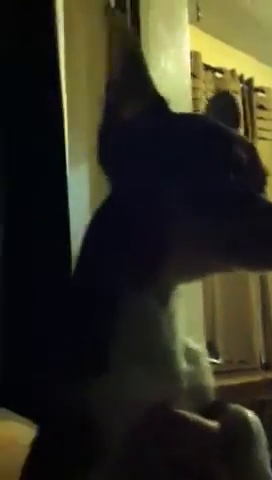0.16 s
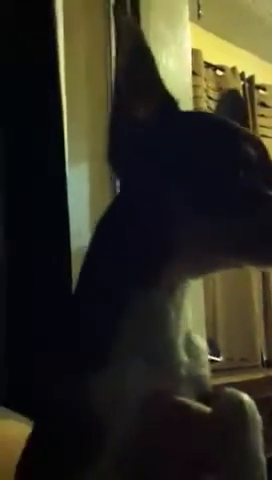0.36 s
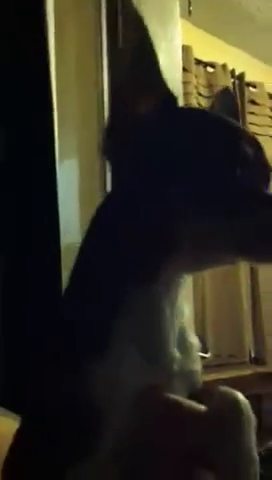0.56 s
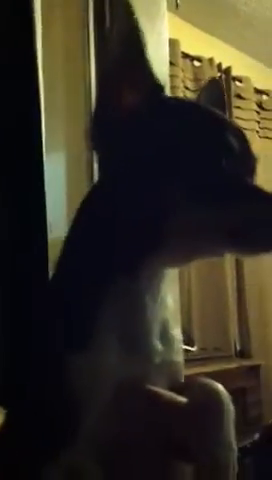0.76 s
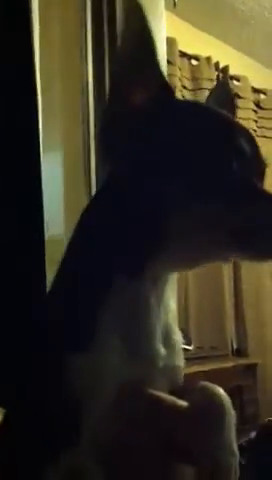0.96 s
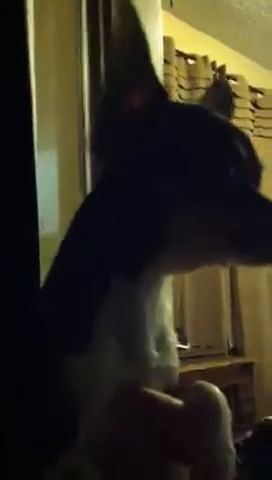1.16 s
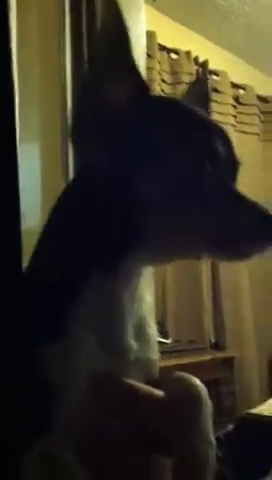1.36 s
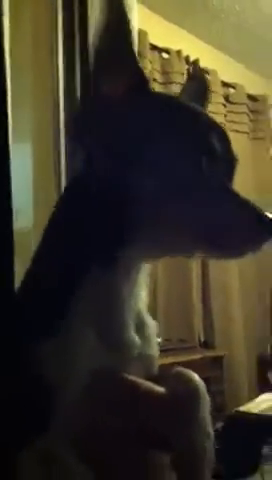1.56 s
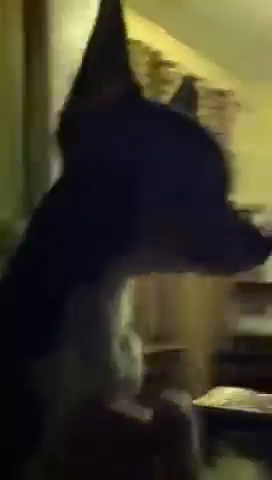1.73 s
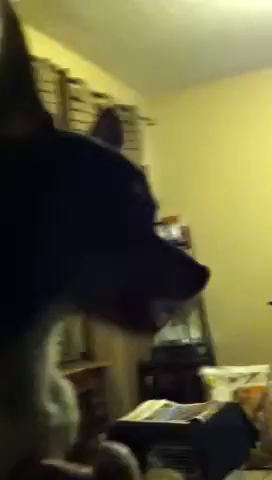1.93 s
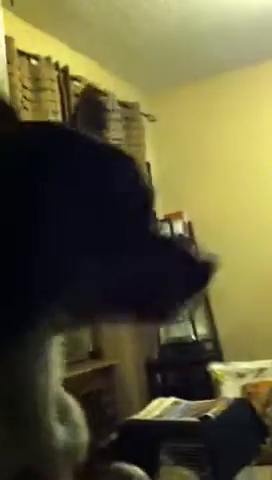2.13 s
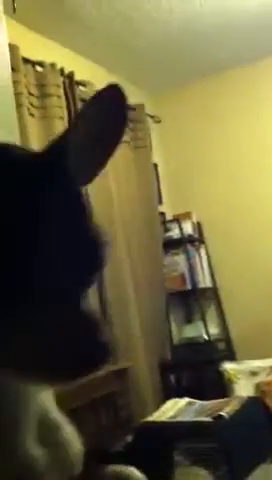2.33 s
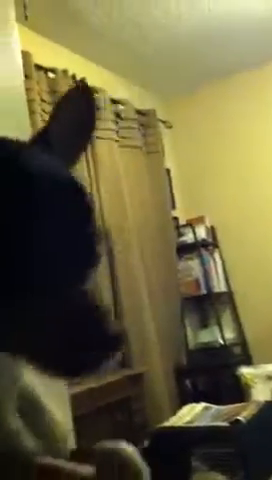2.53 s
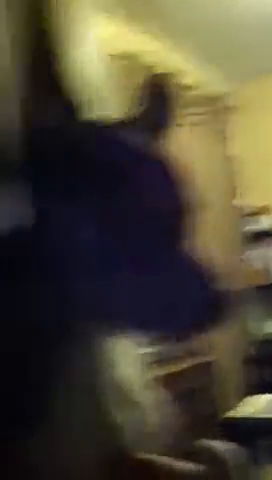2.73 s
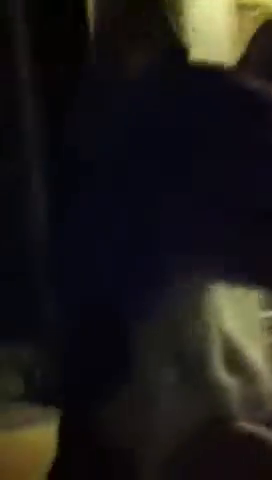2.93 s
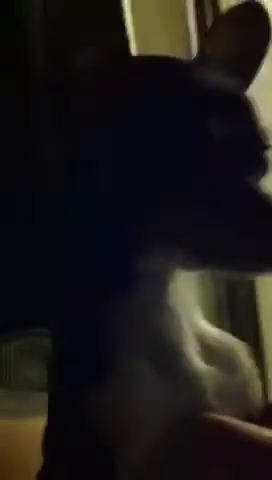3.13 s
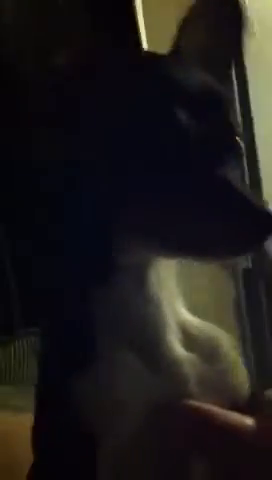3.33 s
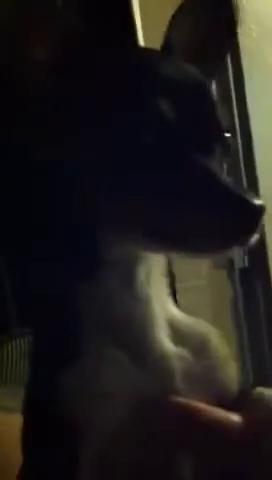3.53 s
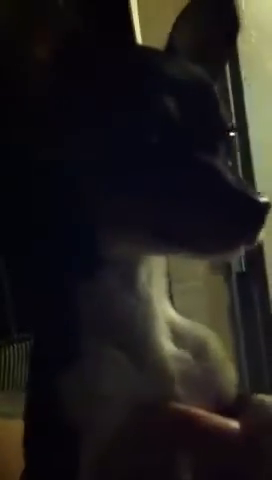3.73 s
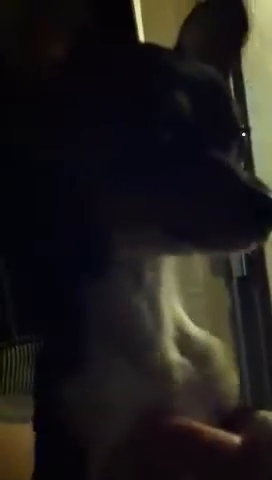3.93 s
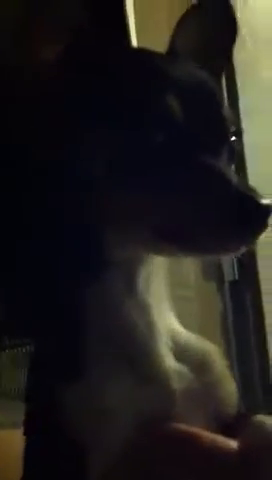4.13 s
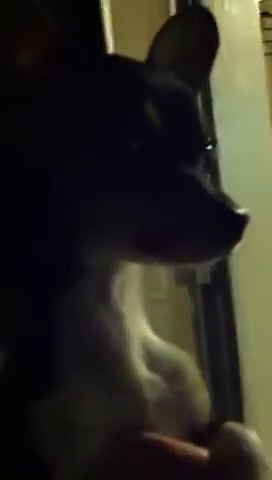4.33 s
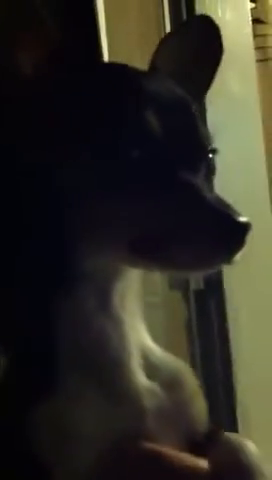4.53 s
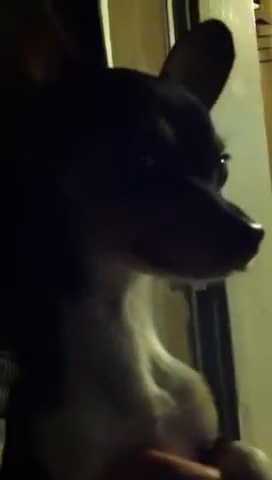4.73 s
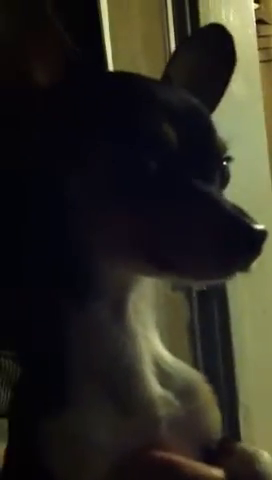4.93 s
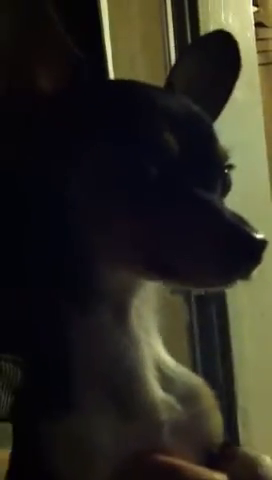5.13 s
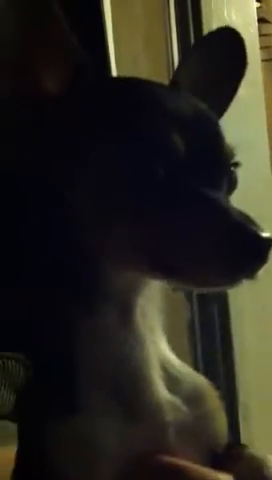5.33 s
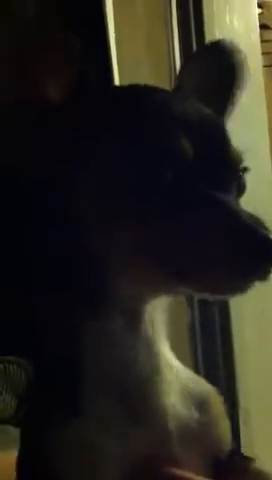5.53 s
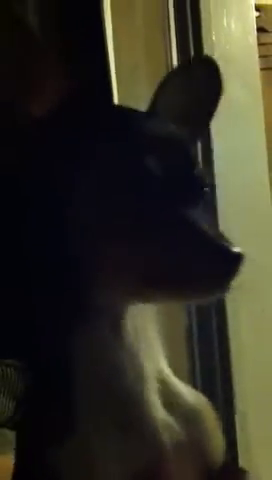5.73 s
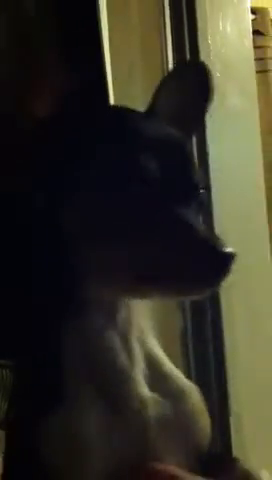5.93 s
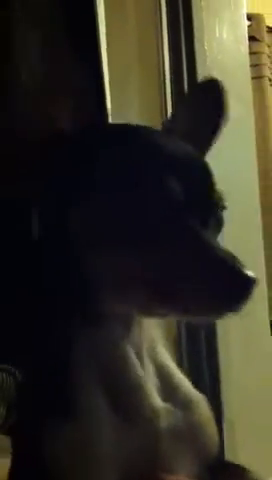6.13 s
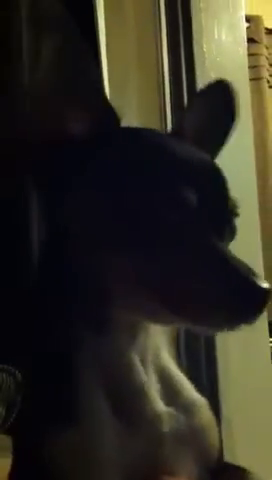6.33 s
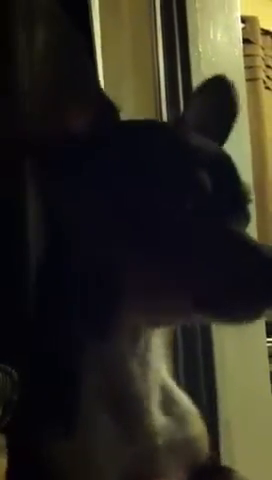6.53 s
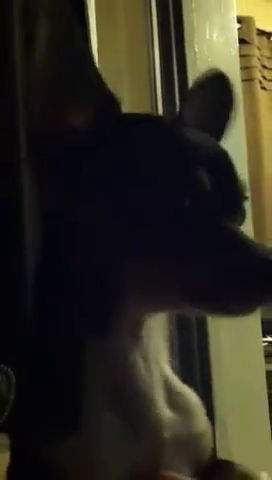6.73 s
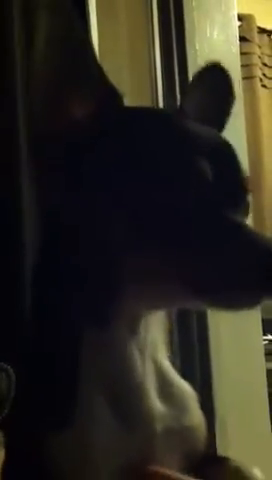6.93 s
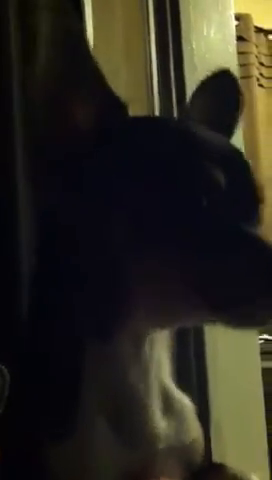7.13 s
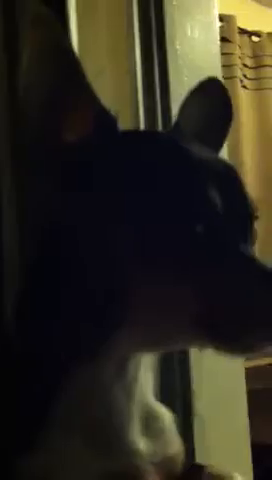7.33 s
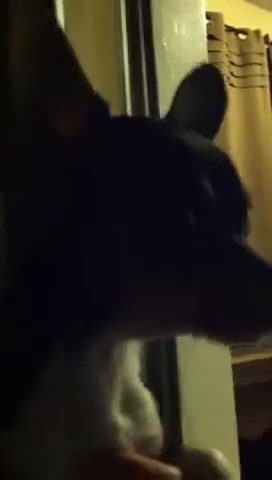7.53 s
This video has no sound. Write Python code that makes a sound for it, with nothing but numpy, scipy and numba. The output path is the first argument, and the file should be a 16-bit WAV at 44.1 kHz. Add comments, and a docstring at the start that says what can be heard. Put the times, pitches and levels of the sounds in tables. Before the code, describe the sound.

Quiet furnished living room with faint steady hiss and hum. A little dog right at the microphone starts with a nasal, closed-mouth growl chopped into quick flutters, dying away after a second. Four clipped, rough barks follow with long gaps between the first three, each trailing a short breath and small room echo. Tiny metal tag clicks come between. The last bark leads straight into another purring growl that lasts to the end.

```python
"""Small dog growling and barking indoors

A small dog close to the microphone growls, barks four times and growls again in a quiet furnished room.
The growl is a train of vocal pulses chopped into throbs by a flapping palate. Each bark drives jittered
pulses and noise through an opening mouth and ends in a puff of breath. The room echoes the dog, hums and
hisses faintly; a metal collar tag ticks.
"""
import sys
import numpy as np
from scipy import signal
from scipy.fft import rfft, irfft
from scipy.io import wavfile
from scipy.ndimage import uniform_filter1d
from numba import njit

SR = 44100
rng = np.random.default_rng(int(sys.argv[2]) if len(sys.argv) > 2 else 0)


def generate_wav(signal):
    """Clip the signal to [-1, 1] and save it as 16-bit WAV at the path in sys.argv[1]."""
    frames = np.transpose(np.atleast_2d(signal))
    scaled = np.clip(frames, -1, 1) * 32767
    pcm = np.round(scaled).astype(np.int16)
    wavfile.write(sys.argv[1], SR, pcm)


N = 334278

# Room hiss spectrum. Each row: frequency in Hz, relative density in dB.
AIR_SPECTRUM = [(25, -34), (80, -16), (115, -12), (200, -4.5), (400, -5), (750, -7.5), (1200, -8),
                (2000, -11), (3500, -17.5), (5000, -20.5), (6500, -28), (9000, -32), (13000, -39.5),
                (15500, -51)]
# Appliance tones. Each row: frequency in Hz, width of each of two resonances in Hz, rms level in dB.
APPLIANCE_TONES = [(195.2, 10, -72.5), (381, 4.3, -72.5), (483, 9, -76.5)]
# Palate flapping, one list per steady growl. Each row: time in seconds, throbs per second.
PALATE_FLAPS = [
    [(.0005, 30.6), (.1687, 25.9), (.3369, 23.41), (.5051, 23.02), (.6734, 27.39), (.8416, 24.44),
     (1.0098, 24.56), (1.178, 21.23), (1.3462, 19.18)],
    [(6.8782, 28.22), (7.0515, 27.32), (7.2248, 27.82), (7.3982, 27.67), (7.61, 26)],
]
# Short catches of the voice, before two barks and as the last growl gets going. Each row: start in seconds,
# length in seconds, relative throat level in dB, relative muzzle level of the last pulse in dB.
VOICE_CATCHES = [(3.743, 0.0085, -32, -3), (5.4893, 0.0093, -30.5, -1), (6.607, 0.0073, -32.5, 2),
                 (6.638, 0.014, -34, -0.5), (6.666, .022, -34.5, 1), (6.715, 0.017, -37.5, -2),
                 (6.746, 0.015, -32, -1), (6.778, .0225, -33, 4), (6.818, 0.019, -32, -1.5),
                 (6.856, 0.011, -29, -1.5)]
# Growl voice, one list per growl. Each row: time in seconds, pitch in Hz, throat and muzzle in relative dB,
# nose resonance in Hz, nose level in dB, nostril whistle in Hz, whistle level in dB, throat resonance in Hz,
# mouth resonance in Hz, cheek resonance in Hz, cheek level in dB against the mouth.
GROWL_VOICES = [
    [(0, 212.5, -30.5, -40, 2070, -74, 8340, -82.5, 430, 815, 1110, 3),
     (.12, 213.6, -28, -38.5, 2200, -83, 8330, -84, 450, 773, 1110, 3.5),
     (.24, 207, -31.5, -40, 2380, -74, 8450, -82, 437, 800, 1100, 3.5),
     (.35, 184, -32.5, -42.5, 2580, -73, 8730, -81, 393, 800, 1060, 1.5),
     (.45, 174.2, -34, -44.5, 2750, -70, 8970, -85.5, 372, 790, 990, 4.5),
     (.55, 181.6, -33, -42.5, 2860, -78, 8950, -83, 382, 790, 980, 2.5),
     (.64, 182.6, -33.5, -41.5, 2620, -70, 8900, -84, 384, 830, 1020, 1.5),
     (.72, 198, -32.5, -36.5, 2240, -66, 9060, -82.5, 380, 790, 1120, 2),
     (.83, 196.3, -31.5, -39, 2490, -68, 8800, -83, 380, 784, 1090, 2),
     (.95, 187.3, -32.5, -42, 2520, -71, 8400, -83.5, 385, 770, 1070, 2),
     (1.07, 184, -32.5, -41, 2650, -69, 8600, -83, 380, 830, 1090, 2.5),
     (1.17, 179.7, -33.5, -43.5, 2770, -69, 8750, -85.5, 387, 854, 980, 2.5),
     (1.332, 156.4, -37, -45, 2980, -87, 8640, -89, 330, 794, 1010, -1)],
    [(6.6, 167, -20.5, -30, 2500, -67, 9200, -77.5, 333, 800, 1050, -10),
     (6.85, 171, -32.5, -33.5, 2490, -78, 8000, -91, 358.4, 656, 1040, -7),
     (6.97, 196.3, -29.5, -30.5, 2290, -63, 7900, -87, 403, 707, 1035, -7.5),
     (7.12, 184.7, -31, -34, 2270, -74, 8150, -86.5, 397, 692, 1000, -5),
     (7.33, 186.5, -29, -32.5, 2290, -67, 8600, -85.5, 434, 694, 1020, -6),
     (7.61, 200, -31.5, -32, 2330, -74, 9260, -88, 413, 720, 1010, -6)],
]
# Fixed throat resonances. Each row: frequency in Hz, width in Hz, relative level in dB.
THROAT_MODES = [(210, 90, -6), (560, 150, -8)]
# Closed muzzle resonances, before and after the barks. Each row: frequency in Hz, width in Hz, relative dB.
CLOSED_MUZZLE_MODES = [
    [(1173, 380, -3.5), (1570, 560, -9)],
    [(1210, 300, -9.5), (1550, 360, -28)],
]
# Barks. Each row: jaws open in seconds, held open in seconds, puff in seconds, mouth in Hz at zero pitch,
# upper resonance in Hz at start, at opening and after the puff, upper level in dB, cheek in Hz at start and
# after opening, cheek in dB against the mouth, bite in dB against the upper resonance, puff in dB, breath
# tail in dB, tail and teeth loss in dB per second, teeth hiss in dB.
BARK_EVENTS = [(2.108, 0.053, 2.141, 660, 4280, 2930, 3900, -44.5, 1480, 1970, -14.5, -16, -38, -52, 59, -53),
               (3.799, 0.0069, 3.83, 473, 1500, 1710, 2200, -29, 1500, 2100, -35, -32, -36, -47, 204, -47.5),
               (5.53, 0.037, 5.579, 443, 1480, 1800, 2650, -27, 1800, 3180, -26.5, -36, -33, -39, 260, -42),
               (6.451, 0.048, 6.498, 413, 1320, 1660, 2180, -34, 900, 2470, -10, -13, -37, -47.5, 139, -74)]
# Bark voice, one list per bark. Each row: time in seconds, pitch in Hz, throat in dB, mouth in dB,
# roughness 0-1.
BARK_VOICES = [
    [(2.086, 265.2, -37, -36.5, 0.2), (2.098, 263.7, -27, -22, 0.29), (2.108, 278.8, -31.5, -20.5, 0.35),
     (2.121, 302.4, -28.5, -18, 0.4), (2.134, 267, -33.5, -32.5, 0.2), (2.15, 248, -40.5, -38.5, 0.3),
     (2.19, 253, -79, -47.5, .5), (2.26, 255, -80, -69, .5)],
    [(3.76, 201, -33, -35.5, 0.27), (3.772, 238.1, -33.5, -35, 0.15), (3.785, 231, -25.5, -31, 0.24),
     (3.8, 342.3, -25, -26, 0.08), (3.815, 275, -27, -30, 0.4), (3.83, 222, -39, -65, 0.17),
     (3.86, 218, -65, -46, .3), (3.95, 206, -60, -66, .3)],
    [(5.501, 234.4, -35.5, -36, 0.08), (5.517, 292.9, -28, -32, 0.08), (5.525, 388.6, -19.5, -22, 0.08),
     (5.536, 407, -23.5, -27.5, 0.12), (5.547, 401.3, -20, -24, 0.38), (5.553, 434.3, -36, -17.5, 0.65),
     (5.56, 459, -22, -21, 0.6), (5.575, 374, -37, -34, 0.27), (5.585, 315, -33.5, -60, 0.5),
     (5.6, 305, -50, -69, .4), (5.68, 303, -58, -62, .4)],
    [(6.423, 226, -33, -38.5, 0.12), (6.44, 284, -31.5, -31.5, 0.23), (6.45, 373, -22, -22, 0.63),
     (6.458, 404, -23, -20.5, 0.13), (6.472, 408.3, -28, -29, 0.1), (6.48, 395, -32, -21.5, 0.48),
     (6.492, 328, -19.5, -28.5, 0.74), (6.503, 268, -31.5, -49, 0), (6.52, 203, -35, -66, 0.6),
     (6.56, 176, -79, -67, .5)],
]
# Breath resonances. Each row: frequency in Hz, width in Hz, relative level in dB.
BREATH_MODES = [(3430, 1140, 7.5), (5720, 1400, 0.5), (8130, 1970, 0), (13000, 1300, -19)]
# Collar tag ticks. Each row: time in seconds, relative strength in dB.
TAG_TICKS = [(2.377, -60), (2.454, -39), (2.6947, -40.5), (3.6794, -67), (4.147, -49)]
# Collar tag modes. Each row: frequency in Hz, relative level in dB, 60 dB decay time in seconds.
TAG_MODES = [(5250, -2.5, 0.009), (6300, -10, .006), (7700, -10, 0.0046), (11000, -20, 0.0037)]

# Room
AIR_RMS_DB, MAINS_HZ, MAINS_RMS_DB = -59.5, 120, -74.5
ROOM_T60_S, TREBLE_T60_S, WALL_CUT_HZ = 0.39, 0.095, 5300   # treble time holds above the wall cut
BARK_ROOM_DB, GROWL_ROOM_DB = -20.5, -17   # echo level against each voice

# Growl; pairs hold the values before and after the barks
SHUT_S = (0.0068, 0.00777)   # pause of the pulses after each throb
CATCH_HZ, CATCH_MUZZLE_DB = 150, -1.5   # nominal pulse rate; muzzle against throat
PITCH_SCATTER = .012   # share by which each throb's pitch strays
FLAP_SCATTER_S, FLAP_SCATTER_DB = .001, .7   # throbs stray in time and strength
SPEEDUP = (0.2, 0.28)   # extra length of a throb's first gap, as a share
LAST_GAP_STRETCH = 1.382
OPENING, OPEN_SHARE = .65, .25   # throat starts each throb at this share, is wide open this far in
CHOKE = .42   # share of throat left in the late last pulse
FIRST_PULSE_DB, LONE_DB = -1, (1, -0.5)   # muzzle change on the first pulse; muzzle gain of the last
DARKEN = (.2, .7)   # drop of muzzle gain over a throb
ESCAPE = (1.5, .6)   # gain of the air escaping with the pulses
MOUTH_WANDER_HZ = 29.8   # rms shift of the closed mouth

# Bark
MOUTH_PER_PITCH, GAPE_HZ_PER_S = 0.93, 3300   # mouth climbs with pitch, and further while jaws are held open
JAW_DB_PER_S, SHUT_LOSS_DB = 1498, 27   # upper resonance swell and fall; its floor under the mouth
FRAY_S = 0.027   # voice frays into noise around the puff
PUFF_RISE_DB_PER_S, PUFF_FALL_S = 843, 0.031
LIMP = 0.81   # weakening of every second pulse per unit roughness
TEETH_HZ, TEETH_WIDTH_HZ = 5150, 530   # width of each of two resonances

# Head and microphone
GROWL_CUT_HZ, BARK_CUT_HZ = 287, 213   # a small head gives no bass
SHAKE_DB, SHAKE_HZ, BARK_SHAKE_DB = -25, 44.4, -15   # barks shake less for their loudness
OVERLOAD, CUTOFF_HZ = 0.32, 15900   # rounding ceiling; top cut is 60 dB deep from here


def amp(db):
    """dB to gain."""
    return 10 ** (np.asarray(db) / 20)


def rms_one(x):
    """Scale to unit rms."""
    return x / np.sqrt(np.mean(x ** 2) + 1e-20)


def even(x):
    """Level a signal to a running rms of one."""
    return x / np.sqrt(uniform_filter1d(x ** 2, size=600) + 1e-12)


@njit
def glide(x, hz, width, rate):
    """Two-pole resonance whose centre may move, gain 1 on top."""
    r, y = np.exp(-np.pi * width / rate), np.zeros(len(x))
    for i in range(2, len(x)):
        drive = (1 - r * r) / 2 * (x[i] - x[i - 2])
        y[i] = drive + 2 * r * np.cos(2 * np.pi * hz[i] / rate) * y[i - 1] - r * r * y[i - 2]
    y[:2] = 0
    return y


def resonance(x, hz, width_hz):
    """One resonance, fixed or gliding."""
    return glide(x, np.clip(hz, 20, .45 * SR) + np.zeros(len(x)), max(width_hz, 1.), float(SR))


def twice(x, hz, width_hz, second_width_hz):
    """Two resonances in series at one centre: steeper skirts."""
    return resonance(resonance(x, hz, width_hz), hz, second_width_hz)


def bank(x, modes):
    """Resonances in parallel, signs alternating."""
    return sum((-1) ** k * amp(db) * resonance(x, hz, width) for k, (hz, width, db) in enumerate(modes))


def lowpass(x, hz):
    """Second-order low-pass."""
    return signal.sosfilt(signal.butter(2, hz, fs=SR, output="sos"), x)


def highpass(x, hz):
    """Second-order high-pass."""
    return signal.sosfilt(signal.butter(2, hz, "high", fs=SR, output="sos"), x)


def room_tone():
    """Coloured hiss, wavering appliance tones (narrow-band noise) and a steady transformer sine."""
    hz = np.maximum(np.fft.rfftfreq(N, 1 / SR), 1)
    air_hz, air_db = np.transpose(AIR_SPECTRUM)
    colour_db = np.interp(np.log(hz), np.log(air_hz), air_db)
    out = amp(AIR_RMS_DB) * rms_one(irfft(rfft(rng.standard_normal(N)) * amp(colour_db), N))
    for tone_hz, width_hz, db in APPLIANCE_TONES:
        out += amp(db) * rms_one(twice(rng.standard_normal(N), tone_hz, width_hz, width_hz))
    mains = np.sqrt(2) * np.sin(2 * np.pi * MAINS_HZ * np.arange(N) / SR)
    return out + amp(MAINS_RMS_DB) * mains


def throbs():
    """Rows per palate flap or catch: first pulse s, pulse Hz, gaps, throat dB, muzzle dB, last pulse dB."""
    rows = []
    for s, length_s, db, last_db in VOICE_CATCHES:
        gaps = round(CATCH_HZ * length_s)
        rows.append((s, gaps / length_s, gaps, db, db + CATCH_MUZZLE_DB, last_db))
    chance = rng.standard_normal((2, 50, 3))
    for palate, voice, shut_s, lone_db, strays in zip(PALATE_FLAPS, GROWL_VOICES, SHUT_S, LONE_DB, chance):
        s, rate = np.transpose(palate)
        end_s = s[-1]
        t = np.arange(s[0], end_s + .05, 1 / 2000)
        flaps = np.cumsum(np.interp(t, s, rate)) / 2000
        starts = np.interp(np.arange(np.interp(end_s, t, flaps) + .5).astype(int), flaps, t)
        voice_s, hz, throat_db, muzzle_db = np.transpose(voice)[:4]
        for first, cycle_s, (stray, late, strong) in zip(starts, np.diff(starts), strays):
            open_s = min(cycle_s - shut_s, end_s - first)
            pitch = np.interp(first, voice_s, hz) * (1 + PITCH_SCATTER * stray)
            gaps = round(open_s * pitch)
            pitch = (pitch + gaps / open_s) / 2   # pulses adjust halfway to fill the throb
            rows.append((first + FLAP_SCATTER_S * late, pitch, gaps,
                         np.interp(first, voice_s, throat_db) + FLAP_SCATTER_DB * strong,
                         np.interp(first, voice_s, muzzle_db) + FLAP_SCATTER_DB * strong, lone_db))
    return rows


def growl_pulses():
    """Throat and muzzle pulse trains: in each throb pulses speed up and darken; a late one ends it."""
    low, high = np.zeros(N), np.zeros(N)
    rows = throbs()
    chance = rng.standard_normal((80, 3, 12)) * [[.035], [1.2], [2.]]   # gap share, throat dB, muzzle dB
    for row, (wobble, throat_stray, muzzle_stray) in zip(rows, chance):
        first, hz, gaps, throat_db, muzzle_db, lone_db = row
        after = int(first > N / SR / 2)
        periods = 1 + SPEEDUP[after] * np.linspace(1, 0, gaps) ** 2.6 + wobble[:gaps]
        periods[-1] *= LAST_GAP_STRETCH
        share = np.append(0, np.cumsum(periods)) / periods.sum()
        at = np.maximum(((first - .0012 + share * gaps / hz) * SR).astype(int), 2)
        at = np.minimum(at, N - 1)
        # the palate shuts the throat off at the end
        swell = np.append(np.interp(share[:-1], [0, OPEN_SHARE], [OPENING, 1]), CHOKE)
        fade = np.append(1.15 - DARKEN[after] * share[:-1], amp(lone_db))
        low[at] = amp(throat_db + throat_stray[:gaps + 1]) * swell
        high[at] = amp(muzzle_db + muzzle_stray[:gaps + 1]) * fade
        high[at[0]] *= amp(FIRST_PULSE_DB)
    return low, high


def growl():
    """Pulses ring the throat and closed muzzle; airflow hisses and whistles in the nose."""
    low, high = growl_pulses()
    s, *columns = np.transpose(np.concatenate(GROWL_VOICES))
    tracks = [np.interp(np.arange(N) / SR, s, c) for c in columns[3:]]
    nose_hz, nose_db, whistle_hz, whistle_db, throat_hz, mouth_hz, cheek_hz, cheek_db = tracks
    later = np.arange(N) > N // 2
    mouth_hz = mouth_hz + MOUTH_WANDER_HZ * rms_one(lowpass(rng.standard_normal(N), 11.0))
    gusts_db = 3.5 * rms_one(lowpass(rng.standard_normal(N), 25.))
    airflow = rms_one(lowpass(low != 0, 120.)) * amp(gusts_db)
    escape = np.where(later, ESCAPE[1], ESCAPE[0])
    high = high + escape * lowpass(high, 220) * rng.standard_normal(N)

    throat = twice(low, throat_hz, 340, 333) - bank(low, THROAT_MODES)
    muzzle = resonance(high, mouth_hz, 103.6) - amp(cheek_db) * resonance(high, cheek_hz, 135)
    muzzle += bank(high * ~later, CLOSED_MUZZLE_MODES[0])
    muzzle += bank(high * later + 1e-18, CLOSED_MUZZLE_MODES[1])
    muzzle = resonance(muzzle, 615, 934)
    voice = amp(43.5) * lowpass(throat, 342) - amp(42.0) * lowpass(lowpass(muzzle, 1800), 1850)

    air = airflow * rng.standard_normal(N)
    hiss = rms_one(twice(air, whistle_hz, 500, 700))
    sounding = lowpass(lowpass(low != 0, 12.) > .001, 30.)
    nose = rms_one(twice(rng.standard_normal(N), nose_hz, 100, 250)) * sounding
    hiss += amp(-2.0) * rms_one(resonance(resonance(air, 6200, 350), 6960, 500))
    return voice + amp(whistle_db) * hiss + amp(nose_db) * nose


def bark_source(t, start_s, hz, rough, white):
    """Jittered pulses, every second one weakened when rough, mixed with noise that decays in each cycle."""
    jitter = 0.13 * rough * rms_one(lowpass(white[0], 150))
    cycles = np.cumsum(hz * (1 + jitter)) / SR
    cycles -= np.interp(start_s, t, cycles)
    born = np.diff(np.floor(cycles), prepend=0) > 0
    late = np.clip(cycles % 1 / np.gradient(cycles), 0, 1) * born
    pulses = born - late + np.roll(late, -1)   # each pulse falls between two samples
    pulses *= 1 - np.clip(LIMP * rough, 0, 1) * (np.floor(cycles + .5) % 2)
    gated = white[1] * np.exp(-1.5 * (cycles % 1)) * np.sqrt(hz / SR)
    return np.sqrt(1 - rough ** 2) * pulses + 3.54 * rough * gated


def bark(event, voice, fade_s=.08):
    """Pulses and gated noise through throat, mouth, cheek and upper resonances, then a puff of breath."""
    (jaw_s, held_s, puff_s, mouth_hz, shut_hz, open_hz, wide_hz, open_db, low_hz, high_hz,
     cheek_db, bite_db, puff_db, tail_db, loss_db, teeth_db) = event
    s, *columns = np.transpose(voice)
    t = np.arange(s[0] - .03, s[-1] + fade_s, 1 / SR)
    hz, throat_db, mouth_db, rough = [np.interp(t, s, c) for c in columns]
    gape_hz = GAPE_HZ_PER_S * np.clip(t - jaw_s, 0, held_s) * (t < puff_s)
    mouth_hz = mouth_hz + MOUTH_PER_PITCH * hz + gape_hz
    upper_hz = np.interp(t, [s[0], jaw_s, puff_s + 0.014], [shut_hz, open_hz, wide_hz])
    off_s = np.maximum(np.maximum(jaw_s - t, t - jaw_s - held_s), 0)   # time outside the open hold
    upper_db = np.maximum(mouth_db - SHUT_LOSS_DB, open_db - JAW_DB_PER_S * off_s)
    cheek_hz = np.interp(t, [s[0], jaw_s + 0.016], [low_hz, high_hz])
    after = t - puff_s
    fall_db = (puff_db - tail_db) * np.clip(1 - after / PUFF_FALL_S, 0, 1)
    breath_db = np.where(after < 0, puff_db + PUFF_RISE_DB_PER_S * after, tail_db + fall_db - loss_db * after)

    rough = np.clip(rough + np.clip(.5 + after / FRAY_S, 0, 1), 0, 1)
    white = rng.standard_normal((3, SR // 2))[:, :len(t)]
    source = bark_source(t, s[0], hz, rough, white)
    out = amp(throat_db) * even(twice(source, np.maximum(hz, 300), 164, 440))
    out -= amp(mouth_db) * even(twice(source, mouth_hz, 350, 510))
    out += amp(upper_db) * even(twice(source, upper_hz, 200, 1700))
    bite = resonance(resonance(source, 3600, 700), 4000, 1400)
    out -= amp(upper_db + bite_db) * even(bite)
    out += amp(mouth_db + cheek_db) * even(twice(source, cheek_hz, 220, 360))
    out += amp(mouth_db - 29.5) * even(resonance(source, 2340, 950))   # leak between the resonances
    out += amp(breath_db) * even(bank(white[2], BREATH_MODES))
    teeth = rms_one(twice(white[0], TEETH_HZ, TEETH_WIDTH_HZ, TEETH_WIDTH_HZ))
    out += amp(teeth_db - loss_db * after) * np.clip(after / PUFF_FALL_S, 0, 1) * teeth
    fade_in = np.clip((t - s[0]) / 0.0011 + 1, 0, 1)
    fade_out = np.clip((t[-1] - t) / fade_s, 0, 1) ** 2
    return round(t[0] * SR), out * fade_in * fade_out


def barks():
    """Every bark at its moment."""
    out = np.zeros(N)
    for event, voice in zip(BARK_EVENTS, BARK_VOICES):
        at, sound = bark(event, voice)
        out[at:at + len(sound)] += sound
    return out


def tag():
    """Each tick rings the decaying modes of the small metal tag."""
    tick_s, tick_db = np.transpose(TAG_TICKS)
    out, at = np.zeros(N), [round(s * SR) for s in tick_s]
    for hz, level_db, t60_s in TAG_MODES:
        clicks = np.full(N, 1e-18)
        clicks[at] = amp(tick_db + level_db - 8.0 + rng.normal(0, 2.0, len(at)))
        r, w = amp(-60 / (t60_s * SR)), 2 * np.pi * hz / SR
        out += signal.lfilter([0, np.sin(w)], [1, -2 * r * np.cos(w), r * r], clicks)
    return out


def room(x):
    """Diffuse echoes: noise that sets in after the first wall and dies, sooner in the treble."""
    t = np.arange(SR // 2) / SR
    white = rng.standard_normal(len(t))
    dull = lowpass(white, WALL_CUT_HZ)
    echoes = dull * amp(-60 * t / ROOM_T60_S) + (white - dull) * amp(-60 * t / TREBLE_T60_S)
    echoes *= t > .008
    return signal.fftconvolve(x, echoes / np.sqrt(np.sum(echoes ** 2)))[:N]


def microphone_shake(closed, opened):
    """The voice shakes the hand-held microphone: low noise that follows its loudness."""
    loudness = lowpass(abs(closed) + amp(BARK_SHAKE_DB) * abs(opened), SHAKE_HZ)
    rumble = rms_one(lowpass(lowpass(rng.standard_normal(N), SHAKE_HZ), SHAKE_HZ))
    return amp(SHAKE_DB) * loudness * rumble


def scene():
    """The dog, its echoes and the room's own sound."""
    closed = highpass(growl(), GROWL_CUT_HZ)
    opened = highpass(barks(), BARK_CUT_HZ) + tag()
    echoes = room(amp(GROWL_ROOM_DB) * closed + amp(BARK_ROOM_DB) * opened)
    return (microphone_shake(closed, opened) + closed + opened + echoes + room_tone())[None]


def record(dry):
    """The small microphone rounds peaks and drops the deep bass; the top is cut."""
    rounded = OVERLOAD * np.tanh(dry / OVERLOAD)
    thin = highpass(rounded, 90)
    return signal.sosfilt(signal.cheby2(16, 60, CUTOFF_HZ, fs=SR, output="sos"), thin)


dry = scene()
out = record(dry)
generate_wav(out)
```